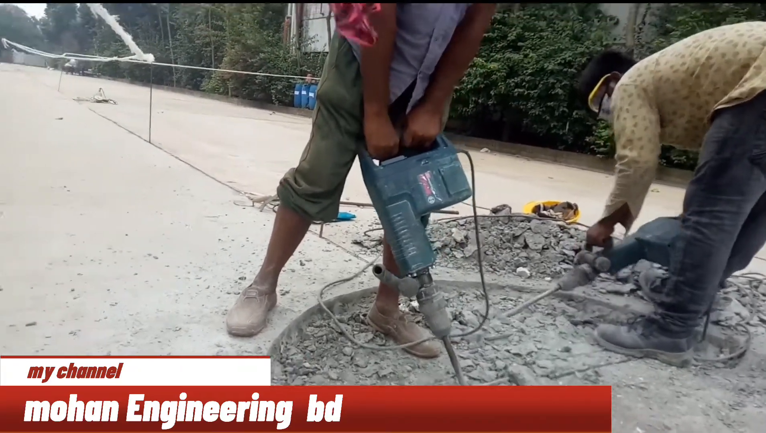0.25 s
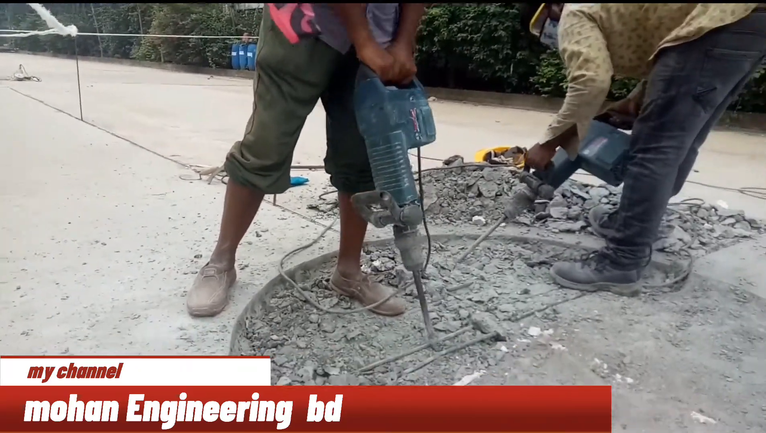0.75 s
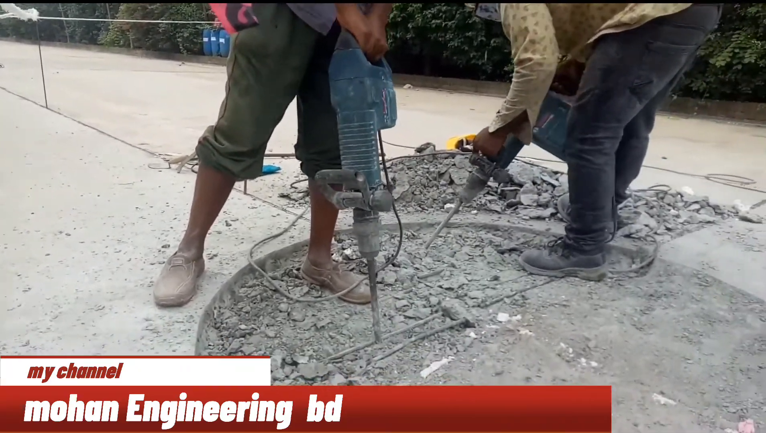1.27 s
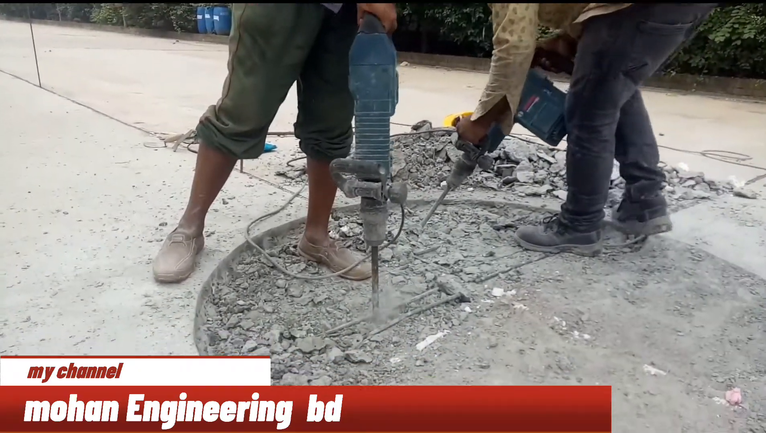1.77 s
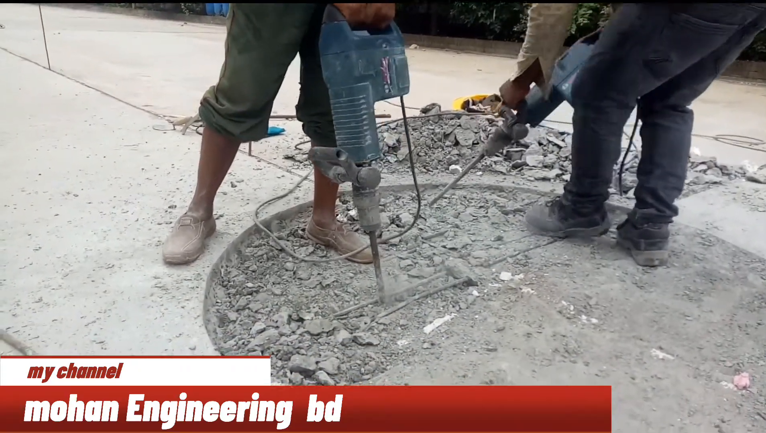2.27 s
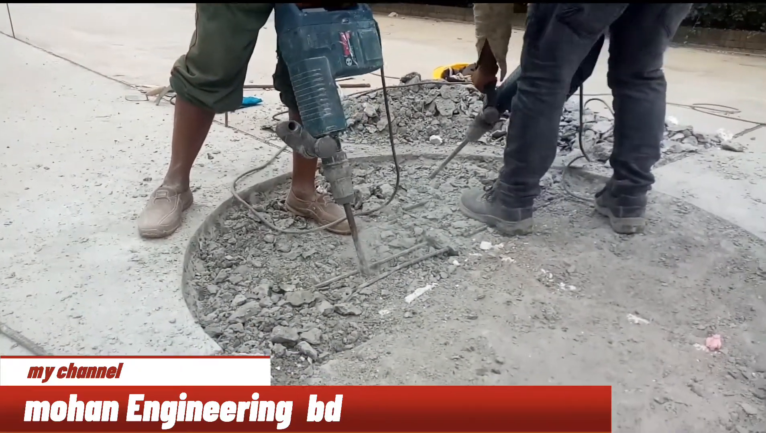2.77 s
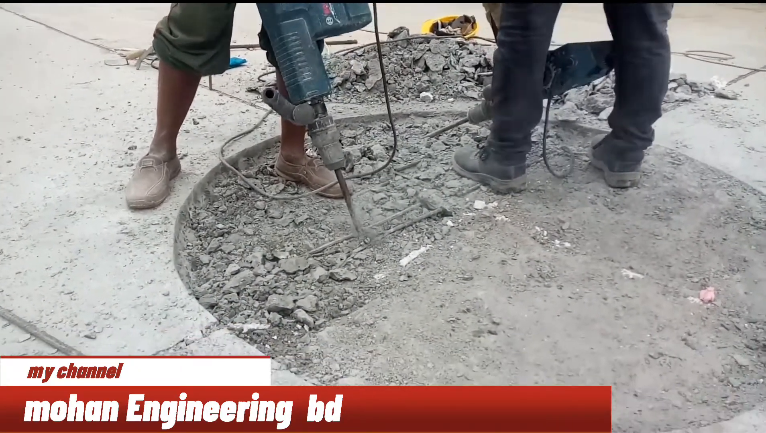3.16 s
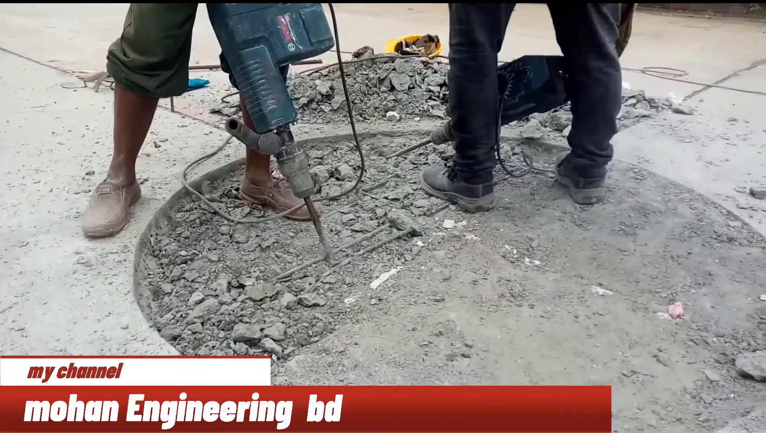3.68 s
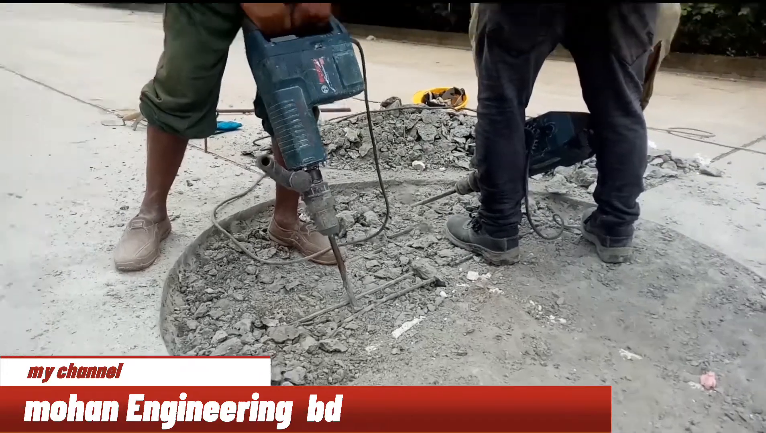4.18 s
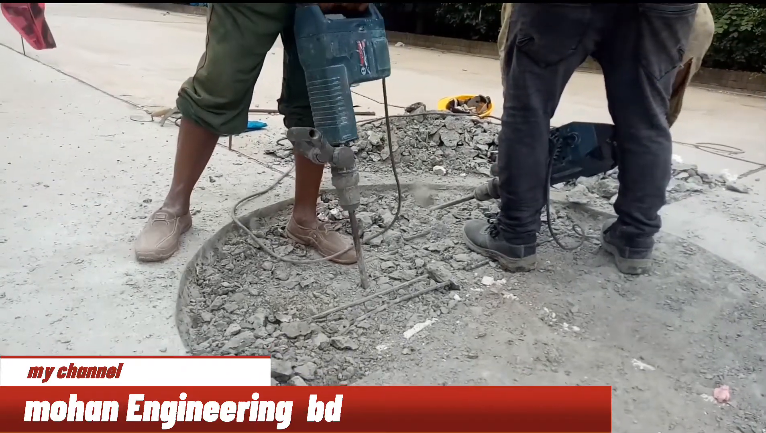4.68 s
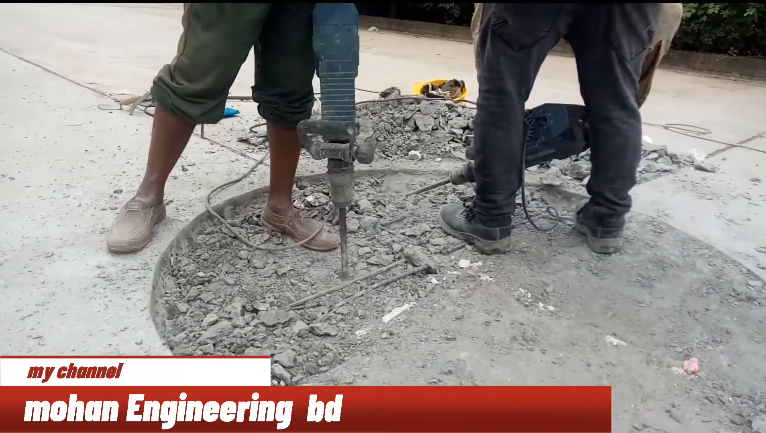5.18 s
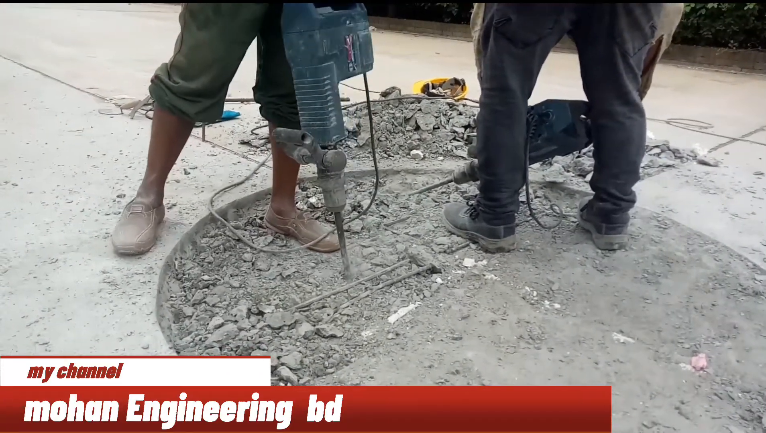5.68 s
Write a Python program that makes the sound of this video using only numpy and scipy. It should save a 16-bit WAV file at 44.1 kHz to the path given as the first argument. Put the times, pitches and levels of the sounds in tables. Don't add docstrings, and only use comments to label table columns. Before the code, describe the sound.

A near electric breaker hammers concrete about 31 times a second, pauses briefly while its motor rasps on, then resumes. A second, weaker breaker joins from the right over loose rubble. Gear whine, slab thuds, grit cracks and ringing steel. Outdoors, close phone pickup, louder and overloaded on the left.

```python
import sys
import numpy as np
from scipy import signal
from scipy.fft import rfft, irfft
from scipy.io import wavfile
from scipy.ndimage import uniform_filter1d

SR = 44100
rng = np.random.default_rng(int(sys.argv[2]) if len(sys.argv) > 2 else 0)


def ratio_of_db(decibels):
    return 10 ** (np.asarray(decibels, float) / 20)


def pcm_store(signal):
    levels = np.round(np.clip(np.atleast_2d(signal), -1, 1) * 32767)
    wavfile.write(sys.argv[1], SR, levels.astype(np.int16).T)


N = 261954
T = np.arange(N) / SR
HZ = np.fft.rfftfreq(N, 1 / SR)
STROKE_HZ = 31


def level(x, rms_db):
    return x * ratio_of_db(rms_db) / np.sqrt(np.mean(x ** 2))


def curves(table):
    s, *columns = np.transpose(table)
    return [np.interp(T, s, c) for c in columns]


def across(points):
    hz, value = np.transpose(points)
    return np.interp(np.log(HZ + 1), np.log(hz), value)


def colour(x, points):
    return irfft(rfft(x) * ratio_of_db(across(points)), N)


def walk(rate_hz):
    hold = int(SR / rate_hz)
    steps = np.repeat(rng.standard_normal(N // hold + 1), hold)
    return 1.294 * uniform_filter1d(uniform_filter1d(steps, hold), hold)[:N]


def fade(x, tau_s):
    return signal.lfilter([1], [1, -np.exp(-1 / (tau_s * SR))], x)


def ring(x, modes, wobble=0):
    bend = 2j * np.pi * np.cumsum(wobble * walk(25)) / SR
    total = 0
    for hz, db, t60_s in modes:
        pole = np.exp((2j * np.pi * hz - np.log(1000) / t60_s) / SR)
        total = total + ratio_of_db(db) * (signal.lfilter([1], [1, -pole], x) * np.exp(bend * hz)).imag
    return total


def hump(turns, centre, width, power=2):
    offset = (turns - centre + .5) % 1 - .5
    return np.exp(-np.abs(offset / width) ** power)


def swells(rows):
    return sum(ratio_of_db(db) * np.exp(-((T - s) / half_s) ** 4) for s, half_s, db in rows)


def strikes(turns, at, scatter_db, jitter_turns):
    chance = rng.standard_normal((400, 2))
    when = np.arange(400) - 5 + at + jitter_turns * chance[:, 0]
    where = np.interp(when, turns, np.arange(N), left=-1, right=-1).astype(int)
    heard = where >= 0
    x = np.zeros(N)
    x[where[heard]] = ratio_of_db(scatter_db * chance[heard, 1])
    return x


# frequency in Hz, correlation.
LIKENESS = [(40, 0.012), (150, 0.84), (400, 0.88), (1800, 0.33), (2600, 0), (4000, 0), (15000, 0)]


def wide_noise():
    c = np.clip(across(LIKENESS), 0, 1)
    mid, side = rfft(rng.standard_normal((2, N)))
    opposite = np.array([[1], [-1]])
    return irfft(np.sqrt((1 + c) / 2) * mid + np.sqrt((1 - c) / 2) * side * opposite, N)


# pressure, slab thud, grit crack in dB.
LIFTED = (-31, -51, -33)


def bouts(rows):
    settle_s = 0.025
    lifted = np.array(LIFTED)[:, None]

    def step(s):
        return np.clip((T - s) / settle_s + .5, 0, 1)

    return lifted + sum((np.array(db)[:, None] - lifted) * (step(start) - step(end))
                        for start, end, *db in rows)


# start in seconds, end in seconds, pressure, thud, crack in dB.
NEAR = [(-.1, 0.753, 0, -19, -26), (1.557, 1.76, -1, -23, -25), (1.76, 2.9, 0, -20, -23.5),
        (2.9, 3.45, 0, -21.5, -25), (3.45, 4.303, -1, -18.5, -25), (5.129, 5.55, -2.5, -17, -22),
        (5.55, 6.1, -1.5, -19.5, -21)]
# time in seconds, lag behind a steady stroke in turns.
NEAR_CRANK = [(0, .22), (.25, .37), (.55, .48), (.77, .61), (1.1, .5), (1.2, .56), (1.55, .74), (1.9, 1.01),
              (2.07, 1.08), (2.25, 1.11), (3.25, 1.57), (3.45, 1.64), (3.75, 1.82), (4.24, 2.05),
              (4.7, 2.0), (5.15, 2.16), (5.45, 2.43), (5.94, 2.67)]
# frequency in Hz, level in dB, t60 in seconds.
SLAB = [(253, -9.5, 0.013), (366, 6.5, 0.035), (382, -7, 0.052), (668, 8, 0.02), (789, 1, 0.027),
        (1136, -7, 0.022)]
# frequency in Hz, level in dB, t60 in seconds.
NEAR_STEEL = [(3775, -4, .2), (4950, -15, .08), (6055, -13, .1), (8780, -11, .12), (14070, -29, .08),
              (15170, -27, .08)]


def near_breaker(near_ring, work):
    return breaker(NEAR_CRANK, NEAR, near_ring, NEAR_STEEL, SLAB, mesh_shift=1, song_gain_db=9.56,
                   knock_db=-6.5, rebound_db=-5, crush_s=0.0017, work=work)


# middle in seconds, half length in seconds, ring in dB.
NEAR_SLACK = [(1.66, .1, -5), (1.835, .065, 3), (2.2, .33, -2.5), (5.18, .06, -7), (5.36, .07, -6),
              (5.5, .4, -7)]


def near_steel_ring():
    seated_db = -13
    return swells(NEAR_SLACK) + ratio_of_db(seated_db + bouts(NEAR)[0])


# start in seconds, end in seconds, pressure, thud, crack in dB.
FAR = [(1.365, 1.562, -5.5, -33, -39), (1.559, 2.101, -11, -23, -23.5), (2.761, 3.075, -5, -20.5, -21.5),
       (3.07, 3.802, -8, -24, -21), (3.802, 4.296, -4.5, -27, -23.5), (4.302, 5.35, -1.6, -24, -23.5),
       (5.349, 6.1, -4, -23, -19.5)]
# time in seconds, lag behind a steady stroke in turns.
FAR_CRANK = [(0, 3.5), (1.4, 2.54), (2.75, 1.56), (3.03, 1.55), (3.5, 1.02), (4.0, .84), (4.25, .65),
             (4.5, .36), (4.75, .17), (5.0, .04), (5.15, -.1), (5.5, -.26), (5.94, -.49)]
# middle in seconds, half length in seconds, ring in dB.
FAR_SLACK = [(1.55, .2, -15), (2.9, .13, -1), (3.9, .3, -20)]
# frequency in Hz, level in dB, t60 in seconds.
FAR_STEEL = [(7160, -4.5, 0.064), (7400, -26, .03)]
# frequency in Hz, level in dB, t60 in seconds.
RUBBLE = [(396, -20, 0.029), (780, -1.5, 0.025), (1160, -25, 0.014), (1624, 9, 0.019)]


def far_breaker(work):
    return breaker(FAR_CRANK, FAR, swells(FAR_SLACK), FAR_STEEL, RUBBLE, mesh_shift=1.04, song_gain_db=0.39,
                   knock_db=-14.0, rebound_db=-10.0, crush_s=0.0019, work=work)


def breaker(crank, table, slack, steel, ground, mesh_shift, song_gain_db, knock_db, rebound_db, crush_s, work):
    mesh_hz, song_db, rasp_db = work
    press_db, thud_db, crack_db = bouts(table)
    turns = STROKE_HZ * (T - .0008) - curves(crank)[0]
    load = ratio_of_db(press_db)
    first = load * strikes(turns, 0, 1.0, 0.0031)
    blow = first + load * ratio_of_db(rebound_db) * strikes(turns, 0.1292, 1.05, 0.0094)
    song = gear_song(turns, load, mesh_hz * mesh_shift, song_db + song_gain_db)
    thud = ratio_of_db(thud_db) * load.max() * slab_thud(blow, ground)
    crack = ratio_of_db(crack_db) * grit_crack(blow, crush_s, rebound_db)
    knock = ratio_of_db(rasp_db) * gear_knock(turns, knock_db)
    return song + thud + slab_boom(first) + crack + knock + chisel_ring(turns, slack, steel)


# multiple of the mesh, level in dB.
TEETH = [(1, 0), (2, -22), (4, -31)]


def gear_song(turns, load, mesh_hz, song_db):
    stroke = np.floor(turns - .5).astype(int) + 10
    stroke_db = 1.34 * rng.standard_normal(400)[stroke]
    push = load * ratio_of_db(stroke_db) + ratio_of_db(-12.0 + 1.4 * walk(40))
    squeeze = push * hump(turns, -0.11, 0.13, power=3.9)
    squeeze -= ratio_of_db(-12.5 + 2.0 * walk(40)) * hump(turns, 0.23, .16)
    mesh = 2 * np.pi * np.cumsum(mesh_hz + 5 * walk(60)) / SR
    mesh = mesh + 0.22 * walk(20) * np.array([[1], [-1]])
    return ratio_of_db(song_db) * sum(ratio_of_db(db) * squeeze ** k * np.sin(k * mesh) for k, db in TEETH)


def slab_thud(blow, ground):
    contact_s = 0.000086
    return level(ring(fade(fade(blow, contact_s), contact_s), ground), -4)


def grit_crack(blow, crush_s, rebound_db):
    crush = fade(fade(blow, 0.00059), crush_s) / 26
    chips = ratio_of_db(rebound_db - 6.0) * fade(fade(blow, 0.0017), 0.01) / 90
    grains = (crush + chips) * ratio_of_db(2.35 * walk(300)) * wide_noise()
    return colour(grains, GRIT) * ratio_of_db(20)


def chisel_ring(turns, slack, steel):
    struck = slack * strikes(turns, 0, 2.5, .01)
    free = hump(turns, .26, .3, power=4)
    chisel = ratio_of_db(-6.5) * free * ring(struck, steel, wobble=.002)
    return np.array([chisel, ratio_of_db(1) * np.roll(chisel, -12)])


# middle in seconds, half length in seconds, gain in dB.
BOOM = [(.62, 0.091, 7), (1.75, 0.022, 3), (5.94, 0.14, 8)]


def slab_boom(first):
    rest_db = -8.5
    modes = [(76, -1, 0.068), (117.5, 1, 0.044), (176.0, 0.5, 0.056)]  # Hz, dB, t60 s
    return (swells(BOOM) + ratio_of_db(rest_db)) * ratio_of_db(-21.5) * ring(first, modes)


def gear_knock(turns, knock_db):
    knock = fade(strikes(turns, -.28, 2.1, .012), 0.004) * wide_noise()
    knock = colour(knock, [(2500, -14.5), (3400, 7), (4300, 7.5), (5000, -53)])
    return level(knock, knock_db) * ratio_of_db(np.array([[.5], [-4]]))


# frequency in Hz, gain in dB.
GRIT = [(300, 3), (1000, 2.5), (2600, 2.5), (4000, 10.5), (4700, 2.5), (5200, -0.5), (7600, -4),
        (8600, -9.5), (15000, -21)]
# time in seconds, mesh in Hz, tooth load in dB, casing looseness in dB.
WORK = [(0, 1860, -10, -21), (.3, 1893, -14.5, -19.5), (.65, 1865, -10.5, -15), (.91, 1878, -26.5, -20),
        (1.17, 1820, -19, -20.5), (1.48, 1825, -15, -19.5), (1.65, 1884, -29, -13.5),
        (1.82, 1809, -26.5, -6), (1.95, 1835, -16.5, -18), (2.34, 1861, -8.5, -12), (2.6, 1868, -15, -22.5),
        (2.9, 1840, -10.5, -21), (3.3, 1884, -13, -16.5), (3.7, 1853, -11, -13.5), (4.25, 1851, -13, -15),
        (5.05, 1875, -17, -15.5), (5.33, 1815, -16.5, -12), (5.94, 1876, -11, -19)]


def machine_work(near_ring):
    mesh_hz, song_db, rasp_db = curves(WORK)
    return mesh_hz, song_db, rasp_db - 4.5 * near_ring


def motors(work):
    mesh_hz, song_db, rasp_db = work
    whirr = colour(wide_noise(), [(1300, -27.5), (1750, -4.5), (1850, 5), (1980, 2.5), (2400, -50.0)])
    whirr = ratio_of_db(.5 * song_db) * level(whirr, -20.5)
    return motor_rumble() + ratio_of_db(rasp_db) * casing_rasp() + whirr + fan_and_mains()


def casing_rasp():
    shake = hump(STROKE_HZ * T - curves(NEAR_CRANK)[0], -0.082, 0.14)
    grains = wide_noise() * ratio_of_db(2.37 * walk(250) + 0.51 * walk(30) + 8.2 * shake)
    band = [(2300, -12.0), (3200, -6.5), (3800, 2.0), (4200, 1), (4650, -3.0), (4900, -36.5)]
    return level(colour(grains, band), -3)


# frequency in Hz, density in dB per Hz.
MOTORS = [(15, -64), (25, -29), (59, -10), (140, -2.5), (178, -9), (469, -12), (631, -6.5), (1020, -23),
          (1620, -11.5), (1850, 1), (2230, -18.5), (2630, -11.5), (3830, -1), (4870, -20), (15500, -55)]


def motor_rumble():
    bed = colour(wide_noise() * ratio_of_db(0.79 * walk(40)), MOTORS)
    low_rms = np.sqrt(np.mean(colour(bed, [(1500, 0), (1501, -60)]) ** 2))
    tint = [(1500, -0.5), (1700, -3.0), (2000, 1.5), (2300, 3.5), (3000, -3.5), (3300, -2), (4500, -4.0),
            (4800, 0.5), (7500, 8), (8000, 0), (12500, 5), (14000, -4)]
    return colour(bed, tint) * ratio_of_db(-28.5) / low_rms


# frequency in Hz, level in dB.
FAN = [(4613, -39)]
# frequency in Hz, level in dB.
HUM = [(101, -42.5), (150.7, -44.5)]


def fan_and_mains():
    return sum(ratio_of_db(db + 5.5 + 2 * walk(5.0)) * np.sin(2 * np.pi * hz * T + 2 * walk(8))
               for hz, db in FAN + HUM)


def scene():
    near_ring = near_steel_ring()
    work = machine_work(near_ring)
    far = far_breaker(work) * ratio_of_db(np.array([[.3], [2.5]]))
    bed = motors(work) * ratio_of_db(np.array([[.6], [-2.5]]))
    return near_breaker(near_ring, work) + far + bed


def band_limit(x):
    return signal.sosfilt(signal.butter(12, 15840, fs=SR, output="sos"), x)


# frequency in Hz, left minus right in dB.
PORTS = [(100, 8.5), (200, 6), (380, 9), (700, 11.5), (1290, 6.5), (2380, 7), (4400, 8.5), (8120, -1.3),
         (15000, 19)]


def record(dry):
    tilt_db = across(PORTS) / 2
    bass_db = across([(15, -12), (50, -14.5), (110, 0)])
    ports = irfft(rfft(dry) * ratio_of_db(bass_db + np.array([tilt_db - 1, -tilt_db - 1.1])), N)
    return band_limit(np.clip(ports, -.98, .98))


dry = scene()
out = record(dry)
pcm_store(out)
```